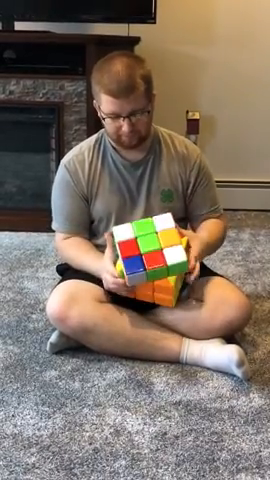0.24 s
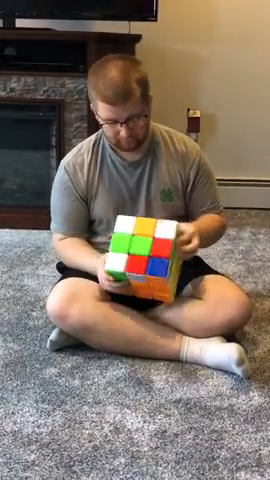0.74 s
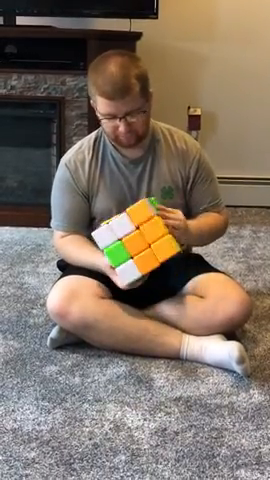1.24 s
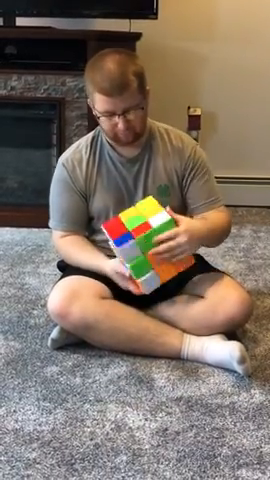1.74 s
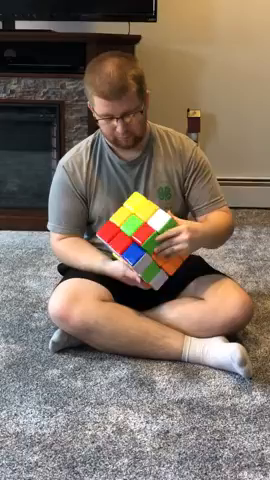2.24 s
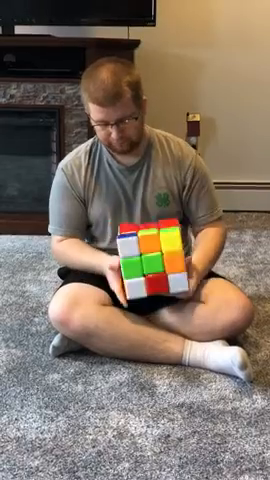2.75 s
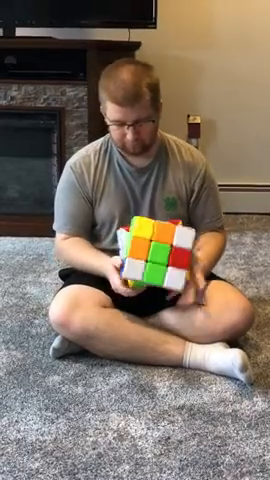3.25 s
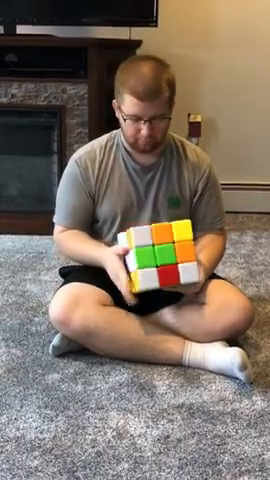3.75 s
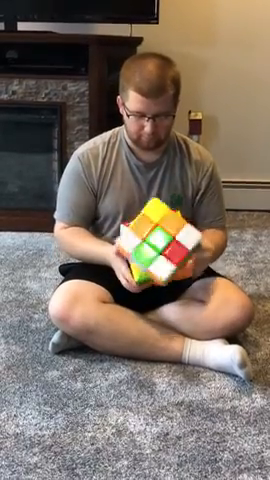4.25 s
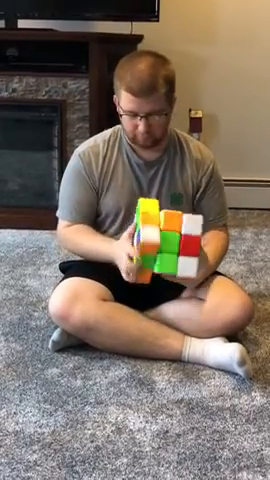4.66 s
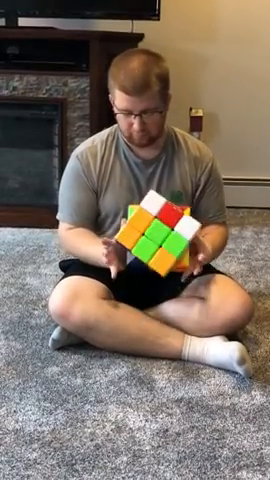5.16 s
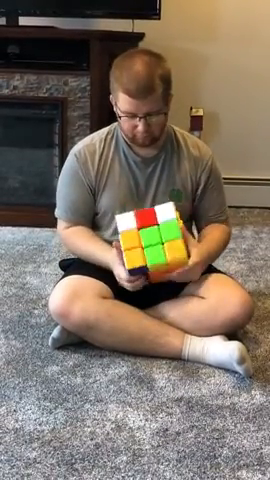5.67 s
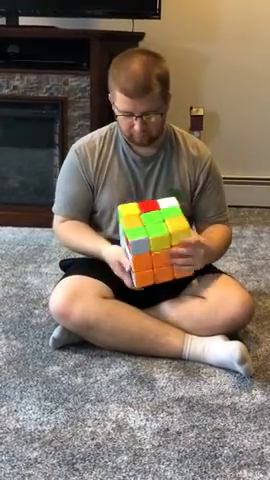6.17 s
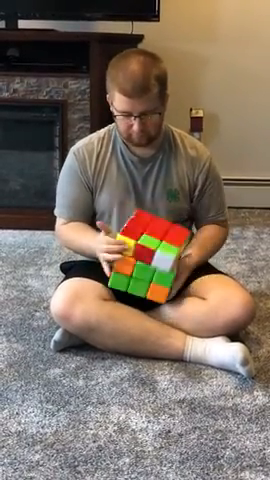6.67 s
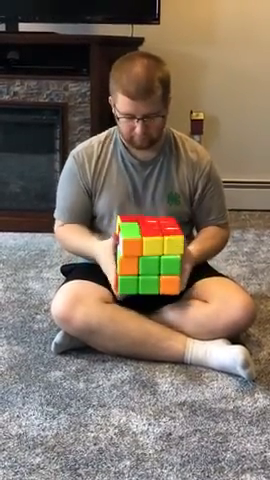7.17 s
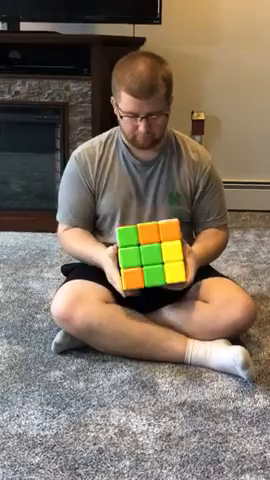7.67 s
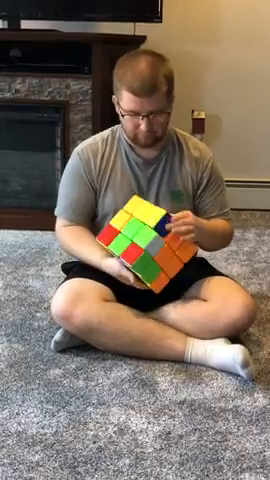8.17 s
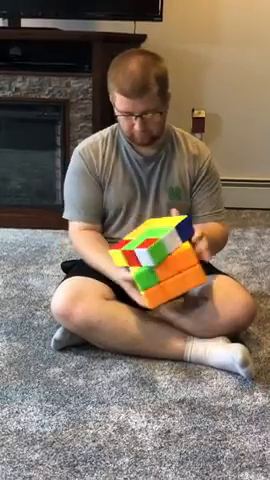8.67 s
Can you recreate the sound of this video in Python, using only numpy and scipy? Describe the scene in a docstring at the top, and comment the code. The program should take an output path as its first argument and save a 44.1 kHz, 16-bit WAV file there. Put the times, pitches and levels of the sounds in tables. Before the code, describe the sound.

Layers of a large hollow plastic puzzle cube are turned by hand, clacking, rattling and snapping unevenly in a quiet carpeted living room.

```python
"""Quiet room noise and a mains hum are heard first, with the rub of plastic layers and a light knock.
A large hollow plastic puzzle cube is turned by hand in a carpeted living room: pieces catch, clatter and snap.
Knocks are bursts of impacts that excite resonances; rubbing is shaped noise that follows the sliding speed.
Delayed bounces and decaying noise bands form the echoes; near the end a low drone, a wavering tone, comes in."""
import sys
import numpy as np
from scipy import signal
from scipy.fft import rfft
from scipy.io import wavfile

SR = 44100
rng = np.random.default_rng(int(sys.argv[2]) if len(sys.argv) > 2 else 0)


def store_pcm(level_fs):
    """Save levels as 16-bit WAV."""
    pcm = np.round(np.clip(level_fs, -1, 1) * 32767).astype(np.int16)
    wavfile.write(sys.argv[1], SR, np.atleast_2d(pcm).T)


N = 392931
TIME = np.arange(N) / SR


def from_db(db):
    """Logarithmic level: decibels to amplitude gain."""
    return 10 ** (np.asarray(db) / 20)


def rms_one(x):
    """Normalisation: scale to rms 1."""
    return x / np.sqrt(np.mean(x ** 2) + 1e-20)


def at_hz(points, hz, axis=1):
    """Logarithmic pitch: one column of a table, interpolated on a log-frequency axis."""
    table = np.array(points)
    return np.interp(np.log(np.maximum(hz, 1)), np.log(table[:, 0]), table[:, axis])


def coloured(x, spectrum):
    """Spectral shaping: filter a steady sound to a spectrum above 20 Hz; rms 1."""
    hz = np.arange(N // 2 + 1) * SR / N
    gain = from_db(at_hz(spectrum, hz)) * (hz > 20)
    return rms_one(np.fft.irfft(rfft(x) * gain, N))


def drift(rate):
    """Slow random modulation: joined random points, rate of them a second; rms 1."""
    knots = rng.standard_normal(int(rate * N / SR) + 2)
    return rms_one(np.interp(TIME * rate, np.arange(len(knots)), knots))


def die_away(x, t60):
    """Exponential decay: spread each bit of energy over a 60 dB fall in t60 seconds; the sum stays the same."""
    keep = from_db(-120 / (t60 * SR))   # energy kept from sample to sample
    return signal.lfilter([1 - keep], [1, -keep], x + 1e-18)


def add(track, s, sound):
    """Superposition: mix a sound into the track from time s on."""
    start = max(round(s * SR), 0)
    track[start:start + len(sound)] += sound[:max(N - start, 0)]


AIR_DB = -55.64
# Spectrum of the still room. Each row: frequency in Hz, relative level in dB.
AIR_SPECTRUM = [(13, -38), (22, -5), (48, -2), (128, 3.5), (376, -7.5), (569, -22), (771, -21),
                (1020, -19.5), (2260, -32.5), (3150, -31), (3810, -35.5), (6440, -33.5), (8260, -38.5),
                (14700, -39), (16000, -37)]


def room_noise():
    """Broadband noise: random pressure filtered to the spectrum of the still room."""
    return from_db(AIR_DB) * coloured(rng.standard_normal(N), AIR_SPECTRUM)


def wavering_tone(hz, waver_rad):
    """Phase modulation: a sine whose phase wanders slowly; rms 1."""
    return np.sqrt(2) * np.sin(2 * np.pi * hz * TIME + waver_rad * drift(4.9))


# Components of the mains hum. Each row: frequency in Hz, level in dB.
HUM_TONES = [(53, -60.5), (120, -58), (200, -68)]


def mains_hum():
    """Additive synthesis: a few low tones of steady level sum to a hum."""
    return sum(from_db(db) * wavering_tone(hz, waver_rad=0.45) for hz, db in HUM_TONES)


SPEED_UP_SHARE = .42   # part of a turn spent gathering speed
HANDLING_DB = -71   # the layers always creep a little in the hands
SHIVER_DB, SHIVER_T60_S = -25, 0.32   # level against the knock (dB), decay time (s)


def turn_times(fastest_s, length_s):
    """Kinematics of a turn: the times in seconds when it starts, is fastest and ends."""
    share = np.clip(SPEED_UP_SHARE, .05, .95)
    return fastest_s + length_s * np.array([-share, 0, 1 - share])


# Turns in which layers slide on each other.
# Each row: time of greatest speed in seconds, length in seconds, rubbing level at that time in dB.
TURNS = [(0, 0.13, -59), (0.139, 0.26, -72), (.72, 0.18, -54.5), (.96, 0.42, -59), (1.46, 0.24, -48),
         (1.84, 0.26, -57.5), (2.151, 0.32, -55), (2.54, 0.17, -50), (3.071, 0.34, -56), (3.33, 0.2, -62),
         (3.621, 0.21, -49), (4.289, 0.33, -51), (4.721, 0.23, -52.5), (5.041, 0.13, -54),
         (5.46, 0.19, -53.5), (5.749, 0.32, -57.5), (5.971, 0.13, -52.5), (6.58, 0.22, -63.5),
         (6.828, 0.32, -54.5), (7.071, .09, -57), (7.2, 0.24, -59.5), (7.449, 0.26, -51),
         (7.849, .28, -52.5), (8.23, 0.13, -55), (8.44, 0.27, -47), (8.83, .26, -54.5)]


def sliding_speed():
    """Motion sets friction level: turns speed up and slow down, knocked layers shiver, the hands creep."""
    turns = np.zeros(N)
    for fastest_s, length_s, db in TURNS:
        turns += from_db(db) * np.interp(TIME, turn_times(fastest_s, length_s), [0, 1, 0])
    shivers = np.zeros(N)
    fade = from_db(-60 * TIME[:SR] / SHIVER_T60_S)
    for s, _, db, *_ in KNOCKS:
        add(shivers, s, from_db(db + SHIVER_DB) * fade)
    return np.sqrt(turns ** 2 + shivers ** 2 + from_db(HANDLING_DB) ** 2)


# Spectrum of plastic sliding on plastic. Each row: frequency in Hz, relative level in dB.
RUB_SPECTRUM = [(200, -19), (500, 9), (1000, 7), (1800, -2), (3000, -1.5), (6000, -11), (10000, -18.5),
                (16000, -20)]


def rubbing(catches_per_s, catch_db, catch_t60, smooth_share):
    """Stick-slip friction: sliding faces hiss and catch in tiny uneven jerks, louder at higher speed."""
    catch_energy = from_db(catch_db * rng.random(N)) ** 2
    catches = (rng.random(N) < catches_per_s / SR) * catch_energy
    jerks = die_away(catches, catch_t60)
    share = np.clip(smooth_share, 0, 1)
    roughness = np.sqrt(share + (1 - share) * jerks / jerks.mean())
    return sliding_speed() * roughness * coloured(rng.laplace(size=N), RUB_SPECTRUM)


# level against the rubbing and scatter of level, hardness and lightness (dB)
RATTLE_DB, RATTLE_SCATTER_DB = 1.5, 2
RATTLE_HARDNESS_DB, RATTLE_CLATTER_S = 3, .003   # mean hardness (dB), clatter (s)


def rattles(count=3):
    """Random excitation: each turn shakes loose pieces, most likely when fastest; rows as in KNOCKS."""
    rows = []
    for fastest_s, length_s, db in TURNS:
        for _ in range(count):
            s = rng.triangular(*turn_times(fastest_s, length_s))
            contact = np.array([db + RATTLE_DB, RATTLE_HARDNESS_DB, 0])
            contact = contact + RATTLE_SCATTER_DB * rng.standard_normal(size=3)
            rows.append((s, RATTLE_CLATTER_S, *contact))
    return rows


def resonate(x, hz, width_hz):
    """Resonance: a two-pole filter with gain 1 on top."""
    r = np.exp(-np.pi * width_hz / SR)
    w = 2 * np.pi * min(hz, SR / 2 - 1) / SR
    return signal.lfilter(np.array([1, 0, -1]) * (1 - r * r) / 2, [1, -2 * r * np.cos(w), r * r], x)


LEVEL_SPAN_S = .01   # a ring's energy is set as an rms level over this span


def struck(hits, modes, levels_db, tilts_db, stretch, lag_s, lowest_hz, grit_db, blow_db, size=3072):
    """Modal excitation: a main blow amid a flurry of small impacts sets the modes of one part ringing."""
    out, t = np.zeros(N), np.arange(size) / SR
    radiation = signal.butter(2, lowest_hz, "high", fs=SR, output="sos")   # small faces radiate no bass
    for (s, clatter_s, *_), level_db, tilt_db in zip(hits, levels_db, tilts_db - tilts_db.mean()):
        age = t / max(clatter_s * stretch, 1 / SR)
        flurry = np.sqrt(age) * np.exp(-age)   # the pieces meet, then settle
        impacts = flurry * rng.standard_normal(size) * from_db(grit_db * rng.random(size))
        impacts[np.argmax(flurry)] = from_db(blow_db) * np.linalg.norm(impacts)
        # every piece is a little different, and is hit in a different place
        piece = rng.normal([0, 1], [1.3, .035], (len(modes), 2))
        ring = np.zeros(size)
        for k, ((hz, width_hz, db), (own_db, detune)) in enumerate(zip(modes, piece)):
            gain = (-1) ** k * from_db(db + own_db + tilt_db * np.log2(hz))
            ring += gain * resonate(impacts, hz * detune, width_hz)
        ring = signal.sosfilt(radiation, ring)
        scale = np.sqrt(LEVEL_SPAN_S * SR) / np.linalg.norm(ring)
        add(out, s + lag_s, from_db(level_db) * scale * ring)
    return out


# level of each part against the knock's strength (dB)
CORE_DB, SHELL_DB, RIM_DB, EDGE_DB = -2, -0.35, -8, -17.5
CORE_HARD, RIM_HARD, EDGE_HARD = -0.046, 1, 1.45   # share of the hardness that each takes
CORE_LIGHT, SHELL_LIGHT = -0.91, 0.45   # share of the lightness that each takes
# knocks above this strength (dB) gain treble, in dB per dB; lighter ones lose it
FIRM_KNOCK_DB, RIM_GROWTH, EDGE_GROWTH = -40, 0.011, 0.2
BRIGHTEN_PER_OCTAVE = 0.2   # tilt inside a part, for each dB of hardness
CLACK_RISE_PER_OCTAVE = 1.1   # tilt of the shells, for each dB of lightness

# Resonances of the heavy core. Each row: frequency in Hz, width in Hz, relative level in dB.
CORE_MODES = [(145.8, 41, -5), (204.3, 57, 0.5), (265, 138, -1.5), (345, 112, -1.5)]
# Resonances of the hollow shells. Each row: frequency in Hz, width in Hz, relative level in dB.
SHELL_MODES = [(543, 393, -9), (677, 277, -2.5), (893, 177, 1.5), (1034, 215, 2), (1181, 249, -2.5),
               (1577, 580, -12.5)]
# Resonances of the rims. Each row: frequency in Hz, width in Hz, relative level in dB.
RIM_MODES = [(1786, 390, -3.5), (2706, 470, -3.5), (2897, 337, 1.5), (4000, 3170, -12)]
# Resonances of the edges. Each row: frequency in Hz, width in Hz, relative level in dB.
EDGE_MODES = [(5350, 2900, -0.5), (6030, 520, 15.5), (9050, 12000, 2), (10800, 17000, -8.5),
              (14600, 3500, -12)]
# Pieces catching and snapping into place.
# Each row: start in seconds, clatter time scale in seconds (before a part's stretch), strength in dB,
# hardness of contact in dB (flat faces < 0 < corners),
# lightness in dB (a whole layer thuds < 0 < a single piece clacks).
KNOCKS = [(.0062, 0.0022, -49.5, -5, -2.5), (0.094, 0.0062, -63, 15.5, 3), (.1265, .005, -55, 6, 2.5),
          (0.2546, .002, -53, 7, -1), (0.4422, .003, -58.5, 13, 7.5), (0.533, .004, -58.5, 12, 3),
          (0.5696, .002, -54.5, -12, 0.5), (.697, .002, -48, -15, 3.5), (0.7247, .002, -47.5, -4, 0),
          (0.9533, .0024, -43, -3, 1), (1.0605, .0012, -33.5, 15.5, 4.5), (1.074, .0028, -26.5, -7, 0),
          (1.138, .0038, -23.5, -0.5, 0.5), (1.2444, .004, -41, -8, -4), (1.2981, .0043, -42.5, 4.5, 2.5),
          (1.3226, .0064, -36, -2.5, -0.5), (1.4172, .0047, -42.5, -8, 0.5), (1.47, .0055, -32, 2, -1),
          (1.5077, .005, -32.5, 0.5, 1), (1.682, .0025, -47.5, 4.5, 3.5), (1.7415, .003, -54, 8, -4),
          (1.8628, .0018, -39, -0.5, 1), (1.8746, .0036, -26.5, 0.5, -0.5), (1.956, .003, -41, -0.5, 3.5),
          (2.1035, .005, -43, -5, 1), (2.1826, .0025, -36, -0.5, 0), (2.209, .0055, -33, 1, -2),
          (2.2653, .004, -39, 0, 2), (2.4812, .0022, -46, 5.5, -2.5), (2.5502, .0032, -25, 1, 2),
          (2.5621, .0024, -26.5, 0.5, -0.5), (2.637, .002, -25, 0, 5), (2.9617, .003, -34, -3.5, 0),
          (3.009, .005, -34.5, 4, 3), (3.0564, 0.0034, -44.5, -1, 0.5), (3.1105, .008, -37, -2.5, -1),
          (3.3076, 0.0035, -55, -2.5, 0), (3.5957, .0025, -38.5, -16, 0), (3.6341, 0.0021, -46, 8.5, 1),
          (3.6739, 0.0007, -43.5, 17, 1), (3.854, .001, -54, 8.5, -1), (3.946, .0047, -33, -0.5, -1),
          (3.9774, .0026, -39, -1.5, 0.5), (4.1114, .0025, -36, 7.5, -0.5),
          (4.1454, .0034, -32.5, -1.5, 1.5), (4.2456, .0048, -35, 0.5, 1), (4.2827, .0025, -37.5, -5, 1),
          (4.3152, 0.0031, -44, 4.5, -1), (4.3559, .0037, -33.5, 1, 1), (4.6198, .002, -46.5, 9, -1),
          (4.6689, .004, -34.5, 0.5, 0), (4.7738, .002, -37.5, -0.5, 2.5), (4.9735, .004, -40.5, -1.5, 2),
          (5.0312, .004, -39.5, -7.5, 1.5), (5.0716, .003, -45.5, 2.5, 2), (5.508, .0035, -37, -0.5, -2),
          (5.729, .001, -44.5, 3, -6.5), (5.8001, .0035, -46.5, -2, -1), (5.8554, .006, -45, 3.5, 3),
          (5.956, 0.0037, -49, 1.5, -2.5), (5.9744, .0035, -45, 2, -5), (6.001, .0018, -29, 9.5, -4),
          (6.0081, .0066, -20, 0, -1), (6.092, .004, -26.5, 0, 0), (6.249, 0.0042, -44, -7, -0.5),
          (6.2722, .0022, -40, 16, 5.5), (6.2815, .004, -32.5, -9, 0), (6.4164, .0018, -50.5, 4.5, 3),
          (6.5597, .004, -49.5, 3.5, -1.5), (6.7239, .0014, -36, 6, 3.5), (6.7551, .003, -32, 0, -0.5),
          (6.8629, .0037, -38, -0.5, 0.5), (7.064, 0.0053, -49.5, 6.5, -5), (7.1503, .003, -55, 5.5, -6),
          (7.2403, .004, -48.5, -1, -1), (7.335, .004, -44.5, 1, -3), (7.3981, 0.0025, -46.5, 7, 5.5),
          (7.4069, .0032, -31, -2, 2.5), (7.4417, .0053, -27, -0.5, 2), (7.461, .0028, -35, 1.5, -0.5),
          (7.499, .003, -23.5, 3, 2.5), (7.7362, .003, -56.5, 7, -8), (7.8247, .009, -34.5, 1.5, -3.5),
          (7.837, .003, -29, 1, 2), (7.9169, .0024, -33, 0.5, 1.5), (8.236, .006, -35.5, 1.5, 0.5),
          (8.37, .0035, -38, 3, -3), (8.3978, 0.0023, -39, -5, -0.5), (8.4084, .0044, -34.5, 1.5, 0),
          (8.489, .0034, -43.5, 2, 0), (8.5134, .002, -46.5, 4.5, 1.5), (8.5467, 0.0045, -44.5, -6, -3),
          (8.7185, .005, -46.5, 3, 0.5), (8.7431, .004, -46, 2.5, -4.5), (8.8486, .0045, -40, 2, -2)]


def knocks(hits):
    """Coupled resonators: rims and edges sound first, shells and core follow; hard contact favours treble."""
    _, _, db, hard_db, light_db = np.transpose(hits)
    core_db = db + CORE_DB + CORE_HARD * hard_db + CORE_LIGHT * light_db
    shell_db = db + SHELL_DB + SHELL_LIGHT * light_db
    rim_db = db + RIM_DB + RIM_HARD * hard_db + RIM_GROWTH * (db - FIRM_KNOCK_DB)
    edge_db = db + EDGE_DB + EDGE_HARD * hard_db + EDGE_GROWTH * (db - FIRM_KNOCK_DB)
    tilt_db = BRIGHTEN_PER_OCTAVE * hard_db
    clack_tilt_db = tilt_db + CLACK_RISE_PER_OCTAVE * light_db
    core = struck(hits, CORE_MODES, core_db, tilt_db,
                  stretch=.7, lag_s=.0003, lowest_hz=111, grit_db=11.0, blow_db=-3.0)
    shell = struck(hits, SHELL_MODES, shell_db, clack_tilt_db,
                   stretch=0.78, lag_s=0.00022, lowest_hz=400, grit_db=26, blow_db=-4.5)
    rim = struck(hits, RIM_MODES, rim_db, tilt_db,
                 stretch=1.0, lag_s=0, lowest_hz=1450, grit_db=17.5, blow_db=-6.5)
    edge = struck(hits, EDGE_MODES, edge_db, tilt_db,
                  stretch=1.0, lag_s=0, lowest_hz=4100, grit_db=46, blow_db=-32)
    return core + shell + rim + edge


def near_echoes(x, level_db, t60, dull_hz, count=20):
    """Early reflection: bounces off holder, fireplace and walls swell and fade as the cube is tilted."""
    delays = np.geomspace(.004, .07, count) * rng.uniform(.9, 1.1, count)
    gains = from_db(-60 * delays / t60) * np.sqrt(delays)
    # bass bends round such small surfaces, treble is soaked up
    passband_hz = [450, min(dull_hz, .45 * SR)]
    bounce = signal.sosfilt(signal.butter(2, passband_hz, "band", fs=SR, output="sos"), x)
    out = np.zeros(N)
    for delay, gain in zip(delays, gains / np.linalg.norm(gains)):
        add(out, delay, gain * drift(3) * bounce)
    return from_db(level_db) * out


# Response of the living room.
# Each row: frequency in Hz, reverberation against direct sound in dB, decay time t60 in seconds.
ROOM_RESPONSE = [(99, -13.5, 0.35), (268, -3, 0.26), (610, -11.5, 0.24), (990, -4, 0.24), (2440, -8, 0.3),
                 (6000, -11.5, 0.33), (15000, -8, 0.11)]


def room(x, first_echo_s, build_t60, count=21):
    """Diffuse reverberation: band energy builds up and decays as noise; carpet soaks up the top soonest."""
    out, white = np.zeros(N), rng.standard_normal((2, N))
    edges = np.geomspace(100, 17000, count + 1)   # bands of about a third of an octave
    for k, (low, high) in enumerate(zip(edges, edges[1:])):
        hz = np.sqrt(low * high)
        band = signal.butter(2, [low, high], "band", fs=SR, output="sos")
        built_up = die_away(signal.sosfilt(band, x + 1e-18) ** 2, build_t60)
        energy = die_away(built_up, at_hz(ROOM_RESPONSE, hz, axis=2))
        noise = rms_one(signal.sosfilt(band, white[k % 2]))   # neighbouring bands use separate noise
        add(out, first_echo_s, from_db(at_hz(ROOM_RESPONSE, hz)) * np.sqrt(energy) * noise)
    return out


# typical delay (s), level against the knock (dB), strength a knock must exceed (dB)
REBOUND_S, REBOUND_DB, REBOUND_ABOVE_DB = .016, -16.5, -38


def rebounds():
    """Rebound: firmly knocked pieces have play and fall back once, a moment later; rows as in KNOCKS."""
    rows = []
    for s, clatter_s, db, *contact in KNOCKS:
        late = rng.uniform(.5, 2)
        if db > REBOUND_ABOVE_DB:
            rows.append((s + REBOUND_S * late, clatter_s, db + REBOUND_DB, *contact))
    return rows


# Level of the low drone. Each row: time in seconds, level in dB.
DRONE_LEVEL = [(0, -72), (7.9, -61), (8.15, -45.5), (8.4, -49), (8.58, -56.5), (8.72, -47), (8.91, -54)]


def drone():
    """Amplitude envelope: one low wavering tone follows a level curve that rises late."""
    level_db = np.interp(TIME, *np.transpose(DRONE_LEVEL))
    return from_db(level_db) * wavering_tone(hz=63.7, waver_rad=0.13)


def scene():
    """Superposition: the cube, its echoes and the background add up."""
    background = room_noise() + mains_hum() + drone()
    rub = rubbing(catches_per_s=150, catch_db=8.0, catch_t60=0.016, smooth_share=0.066)
    cube = rub + knocks(KNOCKS + rebounds() + rattles())
    early = near_echoes(cube, level_db=-11.0, t60=0.086, dull_hz=7200)
    late = room(cube, first_echo_s=.004, build_t60=0.006)
    return (cube + early + late + background)[None]


CUTOFF_HZ = 16100


def record(dry):
    """Band limiting: a steep elliptic low-pass removes the top."""
    return signal.sosfilt(signal.ellip(10, .1, 70, CUTOFF_HZ, fs=SR, output="sos"), dry)


dry = scene()
out = record(dry)
store_pcm(out)
```